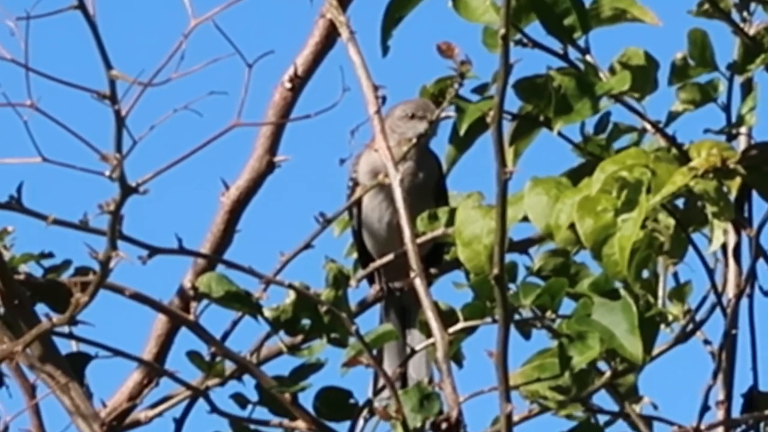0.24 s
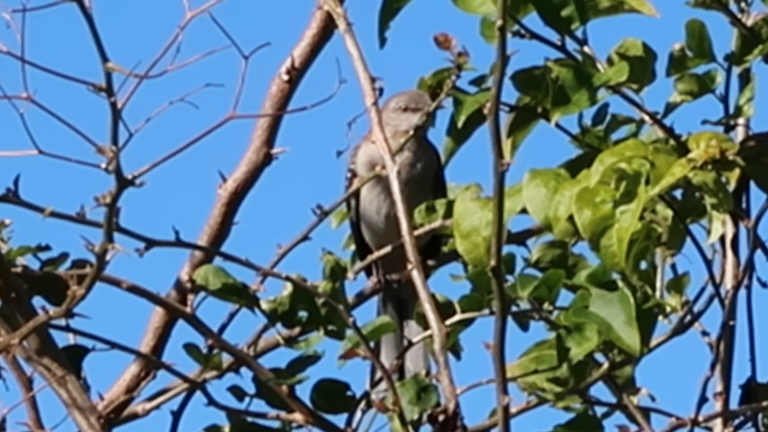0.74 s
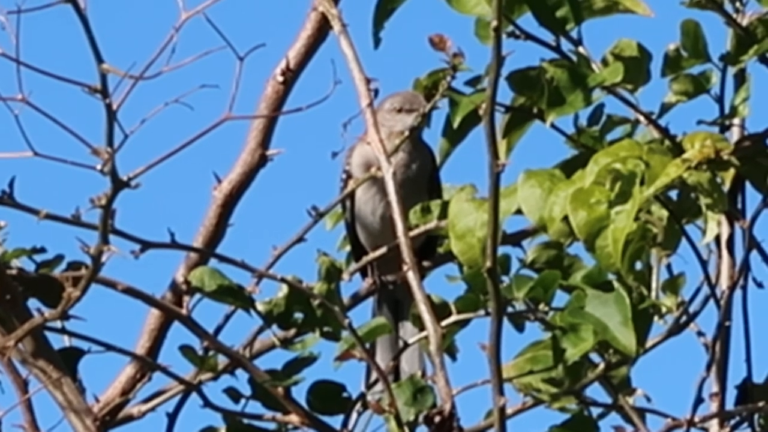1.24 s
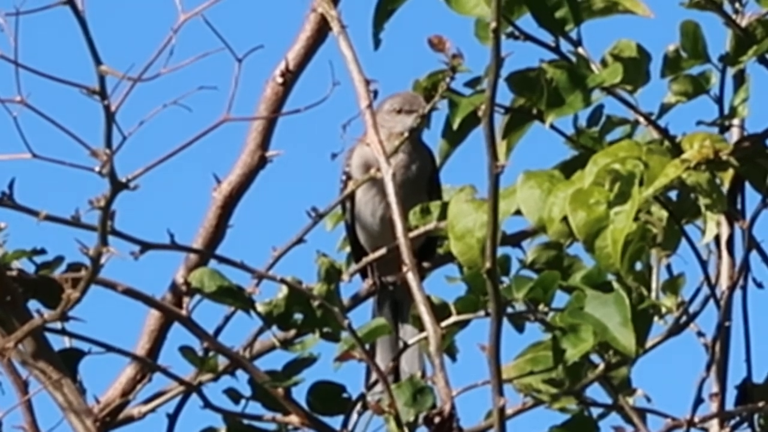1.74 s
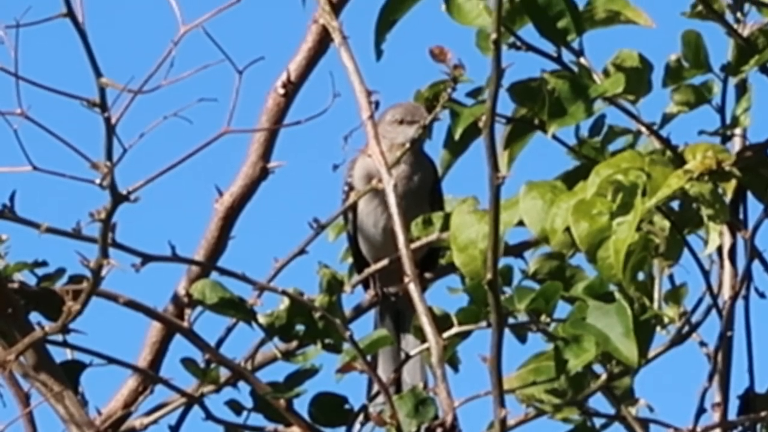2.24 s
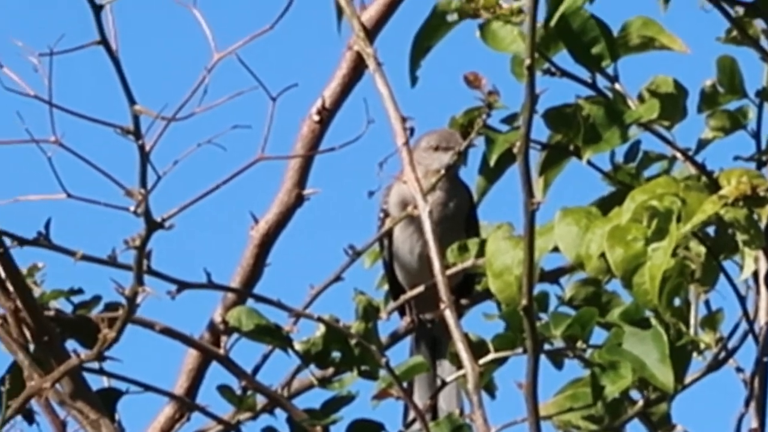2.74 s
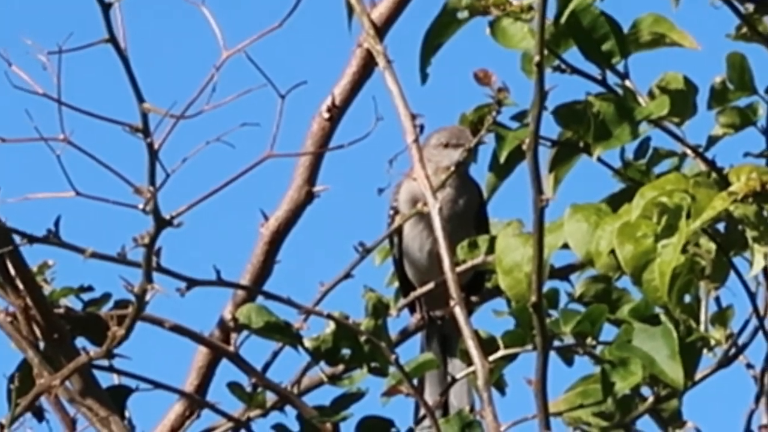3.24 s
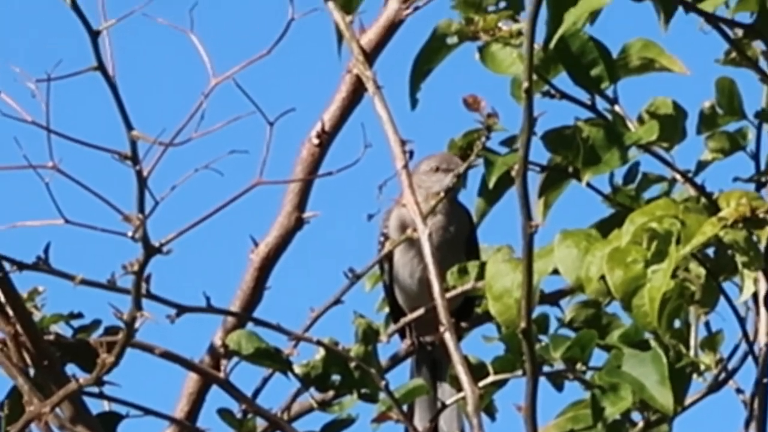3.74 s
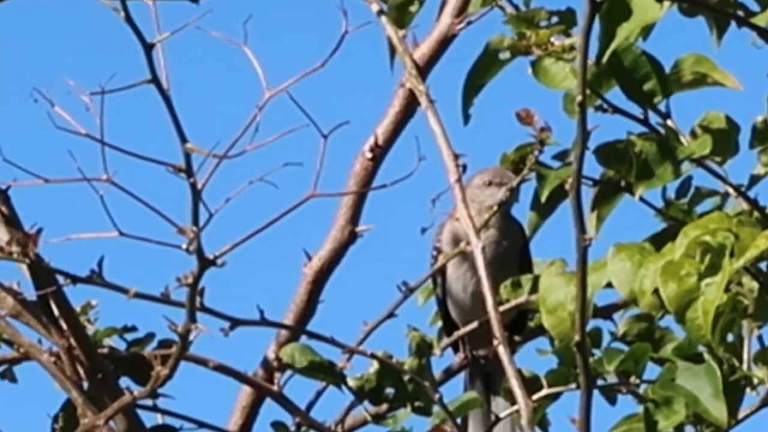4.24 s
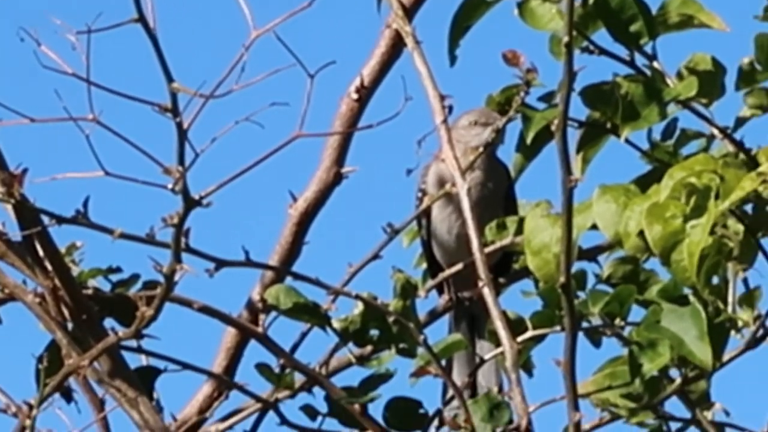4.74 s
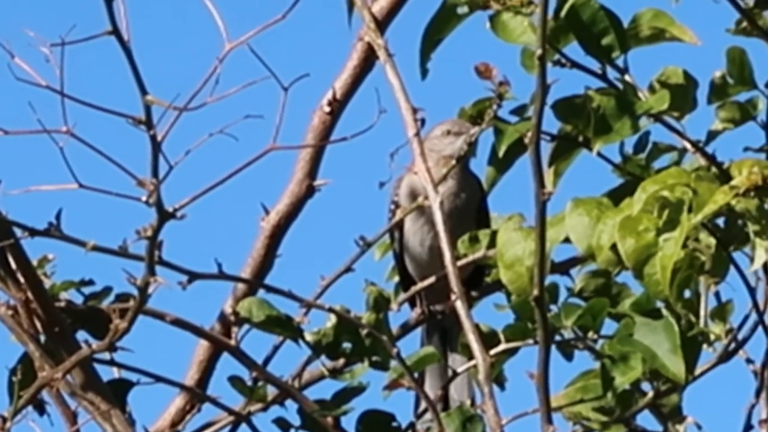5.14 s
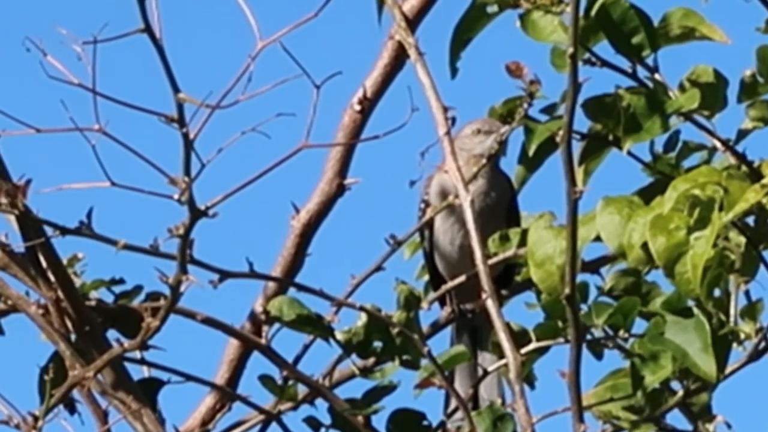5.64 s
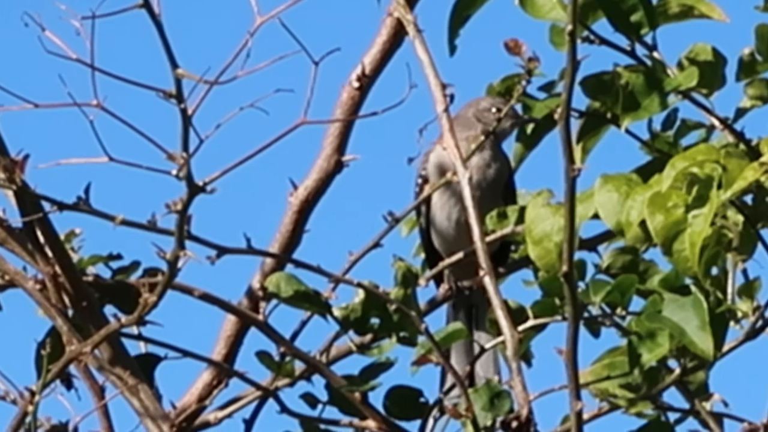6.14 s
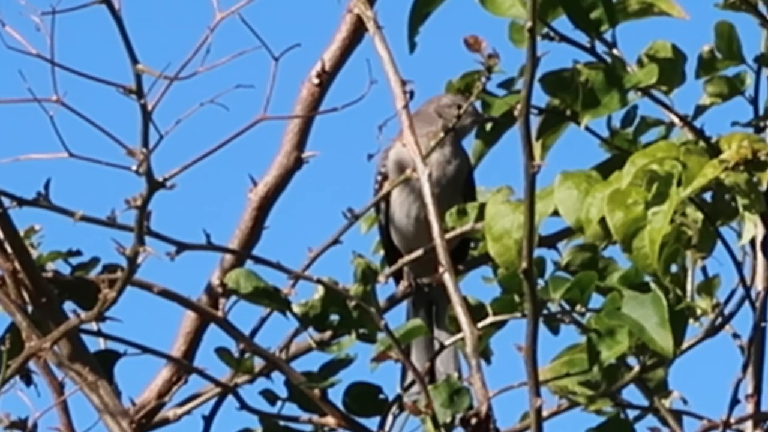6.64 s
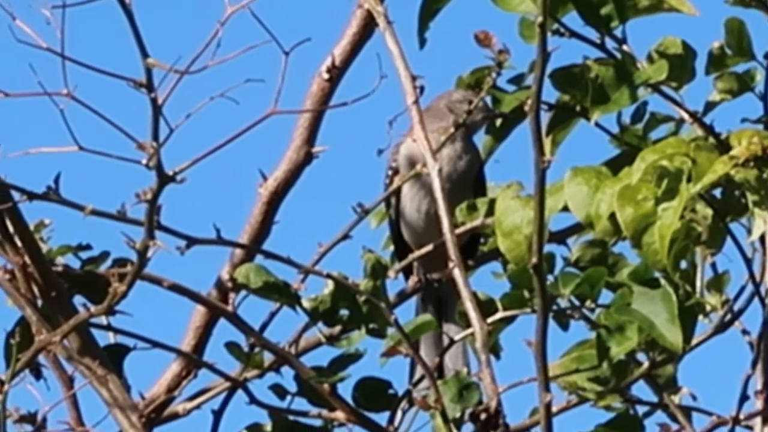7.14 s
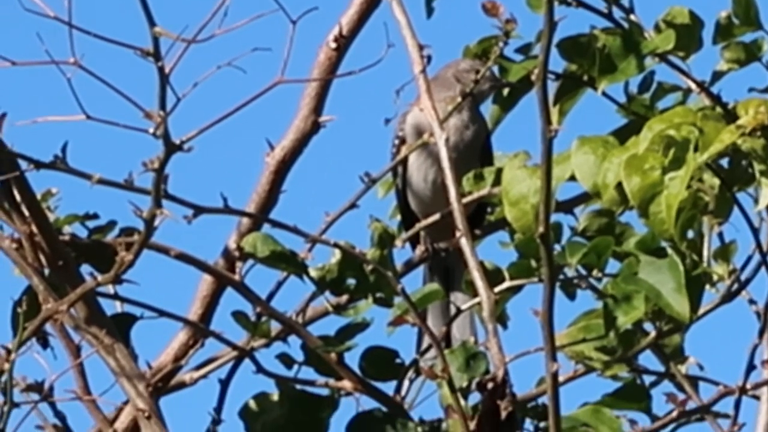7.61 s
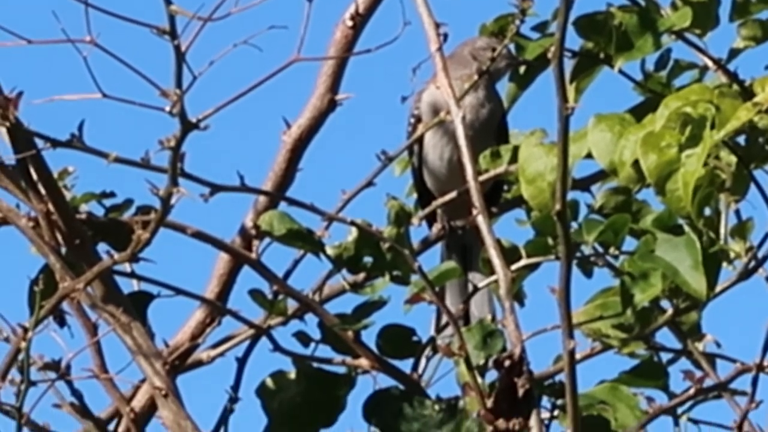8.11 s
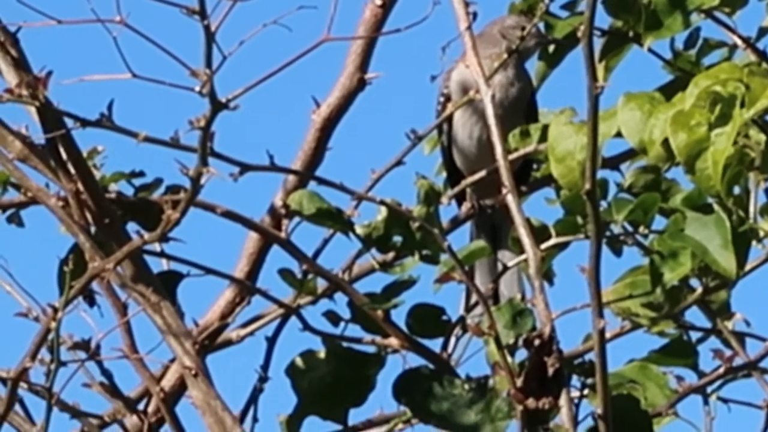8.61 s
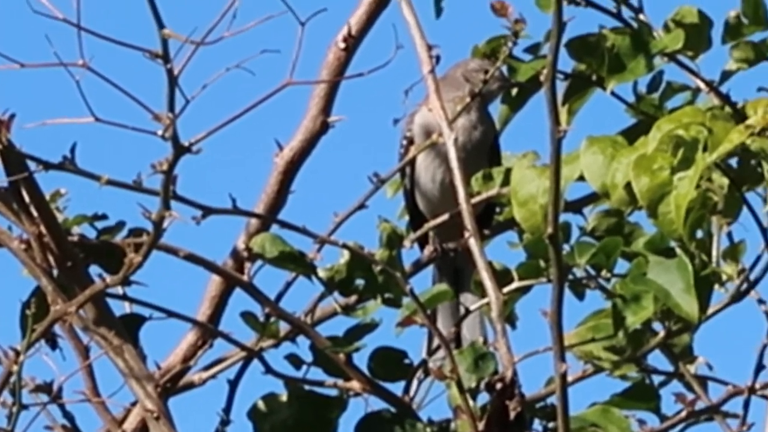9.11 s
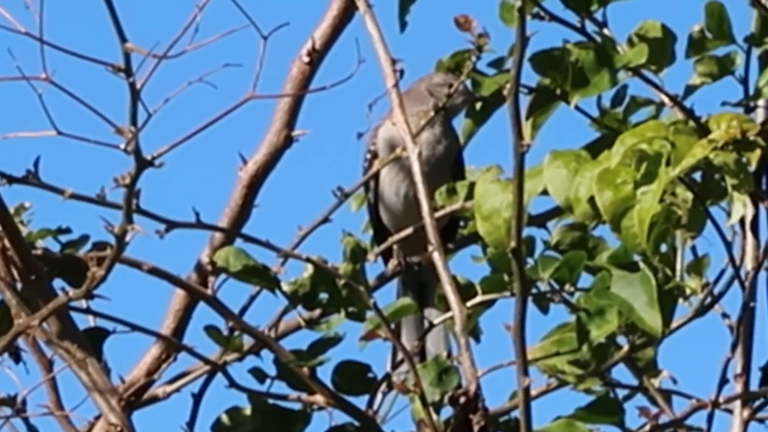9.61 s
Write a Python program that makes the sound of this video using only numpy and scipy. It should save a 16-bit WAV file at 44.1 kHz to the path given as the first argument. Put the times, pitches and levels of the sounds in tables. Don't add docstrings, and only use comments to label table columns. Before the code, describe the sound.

A light propeller aircraft drones low and distant overhead, wavering and slowly sinking in pitch above soft town rumble and faint road hiss.

```python
import sys
import numpy as np
from scipy import signal
from scipy.fft import rfft, irfft, next_fast_len
from scipy.io import wavfile
from scipy.ndimage import uniform_filter1d

SR = 44100
rng = np.random.default_rng(int(sys.argv[2]) if len(sys.argv) > 2 else 0)


def file_out(sig):
    cols = np.atleast_2d(sig).T
    lim = np.clip(cols, -1, 1)
    pcm = np.round(lim * 32767).astype(np.int16)
    wavfile.write(sys.argv[1], SR, pcm)


def ratio_of_db(decibels):
    return 10 ** (np.asarray(decibels, float) / 20)


N = 435266
TIME = np.arange(N) / SR

# time_s, firing_hz
FIRING_RATE = [
    (0.0, 123.3),
    (0.7, 123.45),
    (2.6, 122.2),
    (5.2, 121.2),
    (9.87, 118.9),
]
# centre_s, half_length_s, lift_db
FIRING_SWELLS = [(0.05, 0.13, 2.5), (0.25, 0.25, 5.5), (0.62, 0.26, 7.5), (1.02, 0.23, 6), (1.62, 0.1, 1.5),
                 (2.0, 0.34, 6), (2.7, 0.35, 4), (3.22, 0.23, 4.5), (3.95, 0.26, 6), (4.58, .12, 1),
                 (5.25, .35, 9.5), (5.7, .2, 2), (6.4, 0.43, 3.5), (7.25, 0.26, 2), (7.62, .3, 6.5),
                 (8.25, 0.49, 5.5), (9.2, .15, -2), (9.6, 0.18, 1.5)]
# centre_s, half_length_s, change_db
EVEN_FIRING = [(0.0, 0.15, -13), (1.17, 0.17, -12), (1.65, 0.17, -14), (2.5, 0.44, -6), (3.42, 0.14, -2),
               (4.2, 0.16, -5), (4.7, 0.19, -6.5), (5.9, 0.29, -15), (6.6, 0.29, -17), (5.25, 0.23, 2.5),
               (7.8, 0.25, 1.5), (8.62, 0.18, -20), (9.5, 0.53, -11)]
# centre_s, half_length_s, octave_lift_db, upper_lift_db
CLEAR_AIR = [(0.0, 0.15, 0, 8), (0.8, .12, 0.5, 1.5), (1.35, 0.24, 0, 5), (0.22, 0.12, 4, 3),
             (0.5, 0.27, 11.5, 10.5), (1.1, 0.21, 6.5, 5.5), (1.5, 0.17, 5.5, -2), (1.85, 0.2, 8, 2),
             (2.17, 0.25, 8, 11.5), (2.62, 0.24, 0.5, -11), (3.03, 0.22, 5, 2), (3.6, 0.3, 0.5, -6),
             (3.92, 0.15, 2.5, 0), (4.5, 0.24, 7.5, 0), (5.28, 0.28, 11, 9), (6.0, 0.16, 5.5, 5),
             (6.55, 0.17, 3, -13), (7.25, .15, 2, -3), (7.72, 0.28, 10.5, 5), (8.2, 0.13, -14, 0),
             (8.75, 0.33, 3, 7.5), (9.2, 0.14, -7, 9), (9.85, 0.17, 3.5, -2)]
# firing_multiple, level_db
UPPER_ORDERS = [(2.5, -5.5), (3, -2), (3.5, -10.5), (4, -23)]
# centre_s, half_length_s, lift_db
ROAR_PUFFS = [(0.0, .08, 10), (0.3, .15, 4), (1.1, 0.49, 4.5), (2.2, 0.42, 6.5), (3.1, 0.26, 3.5),
              (4.05, .12, 7), (5.3, 0.22, 10), (5.8, 0.11, 4), (6.25, 0.12, 7), (7.2, 0.17, 4),
              (8.0, 0.33, 7), (8.55, 0.26, 9.5), (8.9, .15, 5)]
# centre_s, half_length_s, lift_db
BLADE_LIFTS = [
    (0.8, .25, 12),
    (1.8, .35, 7),
    (3.6, .5, -8),
    (5.6, .3, 4),
    (7.05, 0.25, 2.5),
    (7.6, .2, -3),
]
# freq_hz, density_db_per_hz
COMMON_SPECTRUM = [(15, -89), (30, -78.5), (60, -68.5), (170, -75), (200, -74.5), (350, -81.5), (460, -81),
                   (530, -86.5), (950, -89), (2000, -95), (3600, -99), (8000, -110), (14200, -121),
                   (15000, -126)]
# freq_hz, density_db_per_hz
OPPOSITE_SPECTRUM = [(20, -105), (35, -102), (60, -89), (100, -82), (200, -76), (460, -77.5), (520, -83.5),
                     (1000, -88), (2800, -99), (4000, -100), (8000, -110), (12500, -116), (14200, -122),
                     (15000, -133)]
# freq_hz, lead_share, level_share
PORT_LEAN = [(100, 0.02, 0.), (350, .2, 0.0069), (550, 0.018, 0.), (1600, -.12, -.08),
             (3500, -0.38, -0.081), (10000, -.05, -.01)]
# centre_s, half_length_s, lift_db
MURMUR_SWELLS = [(0.05, .15, -0.5), (0.45, 0.22, 1.5), (1.05, .2, -0.5), (1.6, .2, 0), (1.95, .15, 3),
                 (2.3, .2, 3), (3.0, .25, 0), (3.75, .3, 0.5), (4.4, .2, 0.5), (5.0, 0.077, 3.5),
                 (5.45, 0.24, 1.5), (5.95, 0.13, -5), (6.3, .15, -1), (6.65, .15, -2), (7.3, .2, 0.5),
                 (8.0, .3, -1), (8.8, .2, 0), (9.2, .1, 1), (9.66, 0.053, 5)]
# centre_s, half_length_s, lift_db
VEHICLES = [(0.05, 0.15, 2.5), (0.8, .12, 0.5), (2.4, .2, -0.5), (3.2, 0.46, 1), (5.35, 0.17, 3),
            (5.74, 0.073, 2.5), (6.6, 0.36, 1), (8.35, 0.41, 1.5), (8.95, 0.16, 0.5), (9.87, .15, 2)]
# freq_hz, width_hz, level_db
ROAD_RESONANCES = [(1642, 150, -69), (1136, 70, -72.5), (1262, 110, -70), (1412, 61, -72.5),
                   (1820, 240, -76.5), (856, 120, -79), (3510, 530, -76), (614, 89, -75)]
# freq_hz, level_db
FAN_TONES = [(347, -64.5), (644, -77.5), (143.4, -61), (59, -67), (87.5, -62.5)]
# freq_hz, level_db
WHINE_TONES = [(13007, -87), (11778, -102)]
# time_s, level_db
SHELL_TICKS = [
    (1.795, -69),
    (2.868, -68),
    (4.987, -74),
    (5.628, -72),
    (6.174, -67),
    (9.291, -66),
]
# start_s, peak_db, pitch_hz, left_minus_right_db, spread_s
BIRD_CHIPS = [
    (5.511, -60, 5300, 0.0, 0.012),
    (6.9322, -55.5, 4900, -3, 0.0035),
]


def curves(table):
    time_s, *columns = np.transpose(table)
    return [np.interp(TIME, time_s, column) for column in columns]


def over_hz(hz, table, axis=1):
    rows = np.array(table)
    return np.interp(np.log(hz), np.log(rows[:, 0]), rows[:, axis])


def lifts(table, axis=2):
    coarse_s = TIME[::128]
    total_db = sum(row[axis] * np.exp(-((coarse_s - row[0]) / row[1]) ** 2) for row in table)
    return np.interp(TIME, coarse_s, total_db)


def walk(rate_hz):
    hold = int(SR / rate_hz)
    steps = np.repeat(rng.standard_normal(N // hold + 1), hold)
    return 1.41 * uniform_filter1d(uniform_filter1d(steps, hold), hold)[:N]


def tone(turns, db):
    return np.sqrt(2) * ratio_of_db(db) * np.cos(2 * np.pi * turns)


def resonance(hz, width_hz, db):
    edges_hz = [hz - width_hz / 2, hz + width_hz / 2]
    sos = signal.butter(2, edges_hz, "bandpass", fs=SR, output="sos")
    ring = signal.sosfilt(sos, rng.standard_normal(N))
    return ratio_of_db(db) * ring / ring.std()


def aircraft():
    blades_per_firing = 0.6387
    turns = -0.27 + np.cumsum(curves(FIRING_RATE)[0]) / SR
    clear_db = lifts(CLEAR_AIR)

    firing_db = -40.5 - 0.4746 * TIME + lifts(FIRING_SWELLS)
    half_db = -51.5 - 0.17 * TIME + lifts(EVEN_FIRING)
    octave_db = -55 - 0.24 * TIME + clear_db
    upper_db = -61 - 0.98 * TIME + lifts(CLEAR_AIR, axis=3)
    roar_db = -58.5 + 0.05 * TIME + lifts(ROAR_PUFFS)

    blade_db = np.minimum(-66.5 + 2 * TIME, -48) + lifts(BLADE_LIFTS)
    blade_octave_db = np.maximum(-51.5 - 2.5 * TIME, -70) + 0.44 * clear_db

    lines = [(1, firing_db), (1.5, half_db), (2, octave_db)]
    lines += [(order, upper_db + db) for order, db in UPPER_ORDERS]
    lines += [(blades_per_firing, blade_db), (2 * blades_per_firing, blade_octave_db)]

    path_turns = 0.021 * walk(2.0)
    drone = 0
    for order, db in lines:
        lag_turns = 0.13 * (order - 1)
        scatter_turns = 0.0053 * order * walk(5.5)
        line_turns = order * (turns + path_turns) - lag_turns + scatter_turns
        drone = drone + tone(line_turns, db + 0.25 * order * walk(9.0))
    roar = resonance(300, 86, -5.0) * ratio_of_db(roar_db + 1.6 * walk(7.3))
    return drone + roar


def town():
    size = next_fast_len(N)
    hz = np.maximum(np.arange(size // 2 + 1) * SR / size, 1)

    def spectrum(table):
        return rfft(rng.standard_normal(size)) * np.sqrt(SR / 2) * ratio_of_db(over_hz(hz, table))

    common, opposite = spectrum(COMMON_SPECTRUM), spectrum(OPPOSITE_SPECTRUM)
    lean = over_hz(hz, PORT_LEAN, axis=2) + 1j * over_hz(hz, PORT_LEAN, axis=1)
    opposite = opposite * np.sqrt(np.clip(1 - abs(lean) ** 2, 0, 1)) + lean * common

    rumble_db = 0.5 * walk(3.4)
    murmur_db = 0.56 * walk(7.0) + lifts(MURMUR_SWELLS) - 0.4
    road_db = lifts(VEHICLES) - 0.7 + 0.76 * walk(14.0)
    treble_db = 2.2 * walk(25.0)
    swells_db = {6: rumble_db, 9: murmur_db, 10: road_db, 14: treble_db}

    out = 0
    for octave in range(5, 15):
        share = np.clip(1 - abs(np.log2(np.maximum(hz, 32)) - octave), 0, 1)
        slow_db, fast_db = (1.2, 1.1) if octave < 8 else (0.25, 0.55)
        flicker_db = slow_db * walk(1.46) + fast_db * walk(13.0)
        common_band = irfft(share * common, size)[:N]
        opposite_band = irfft(share * opposite, size)[:N] * np.array([[1], [-1]])
        swell = ratio_of_db(swells_db.get(octave, 0))
        out = out + ratio_of_db(flicker_db) * (swell * common_band + opposite_band)

    road = sum(resonance(f, width_hz, db) * ratio_of_db(road_db + 1.7 * walk(16.0))
               for f, width_hz, db in ROAD_RESONANCES)
    return out + road * ratio_of_db(np.array([[-1.2], [1.2]]))


def fan():
    return sum(tone(f * TIME + 0.065 * walk(3.0), db + 1.5 * walk(3.03)) for f, db in FAN_TONES)


def camera_whine():
    frame_hz, lead_turns = 30, 0.2
    frame_rad = 2 * np.pi * (frame_hz * TIME + lead_turns)
    throb = 1 + 0.67 * np.cos(frame_rad) + 0.35 * np.cos(2 * frame_rad)
    return throb * sum(tone(f * TIME, db) for f, db in WHINE_TONES)


def camera_shell():
    decay_s = 0.004
    shape = sum(ratio_of_db(db) * np.exp(-((TIME - time_s) / decay_s) ** 2) for time_s, db in SHELL_TICKS)
    return shape * resonance(12300, 2200, 0) * np.array([[1], [-1]])


def bird_chips():
    rise_per_spread = 0.11
    out = np.zeros((2, N))
    scatter = resonance(4700, 2000, -10.0)
    for start_s, peak_db, pitch_hz, pan_db, spread_s in BIRD_CHIPS:
        since_s = TIME - start_s - spread_s
        turns = pitch_hz * since_s * (1 + rise_per_spread * since_s / spread_s / 2)
        chip = tone(turns, -4.0) + scatter
        ports = ratio_of_db(peak_db + np.array([[pan_db], [-pan_db]]) / 2)
        out += np.exp(-(since_s / spread_s) ** 2) * chip * ports
    return out


def scene():
    return aircraft() + town() + fan() + camera_shell() + bird_chips()


def top_cut(x):
    return signal.sosfilt(signal.butter(12, 15030, fs=SR, output="sos"), x)


def record(dry):
    mix = dry + camera_whine()
    return top_cut(mix)


dry = scene()
out = record(dry)
file_out(out)
```